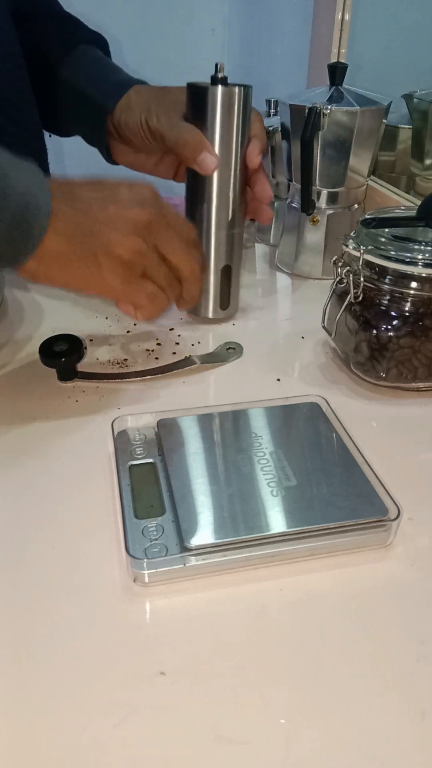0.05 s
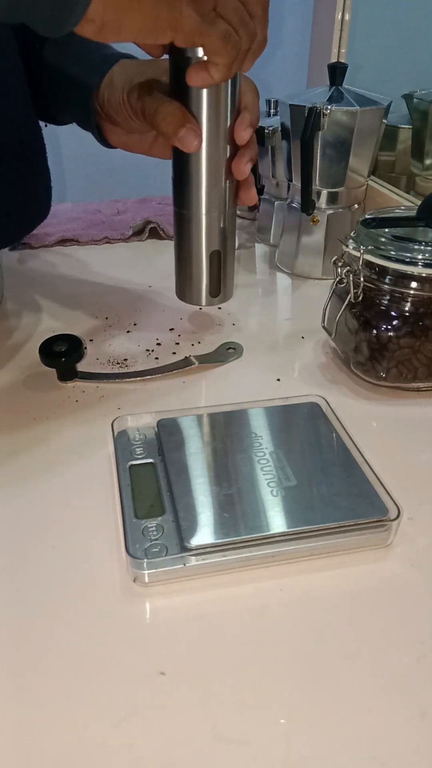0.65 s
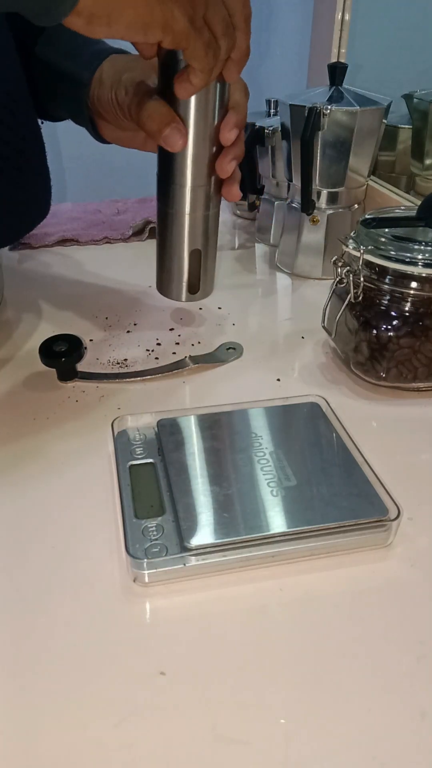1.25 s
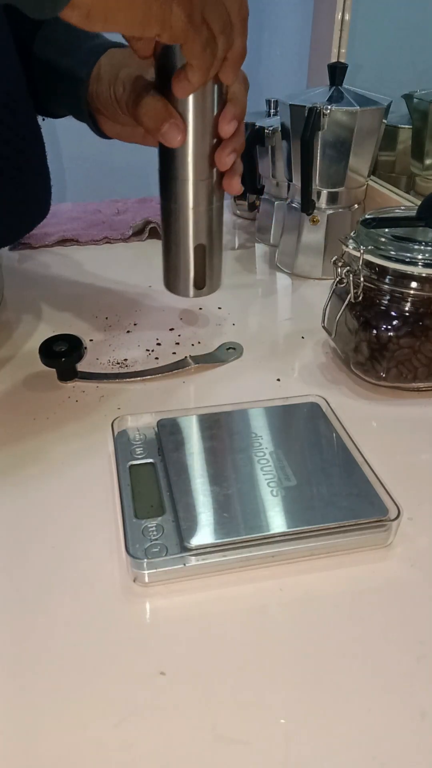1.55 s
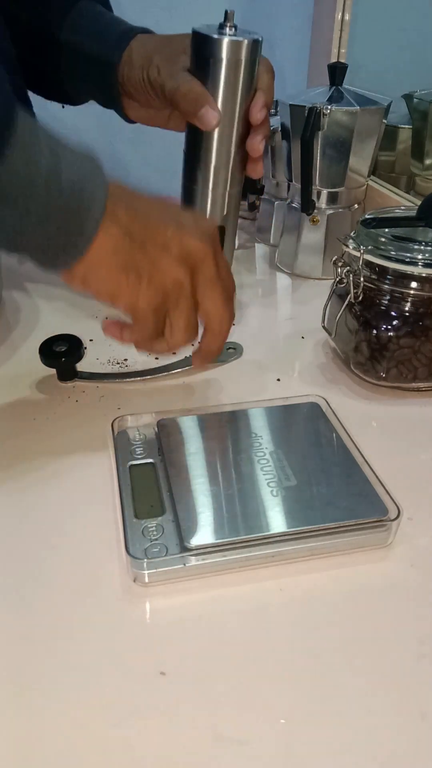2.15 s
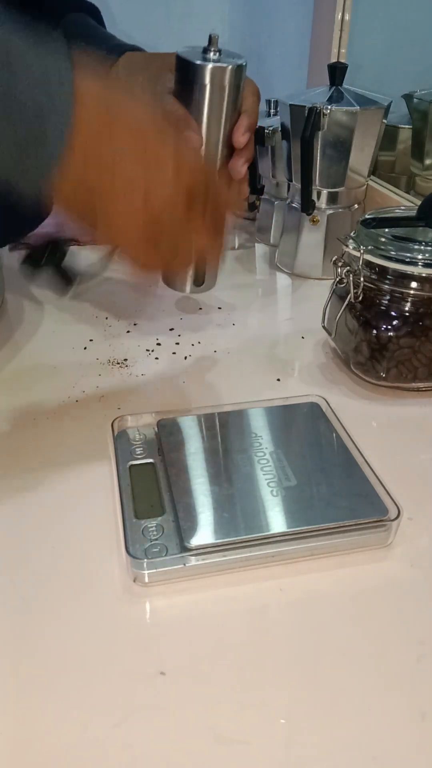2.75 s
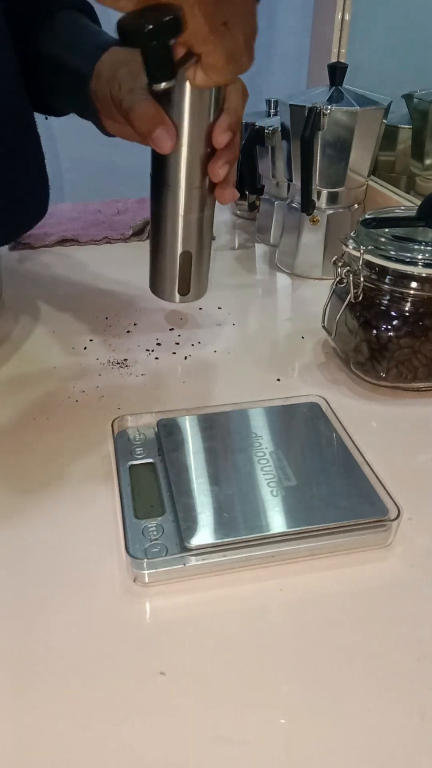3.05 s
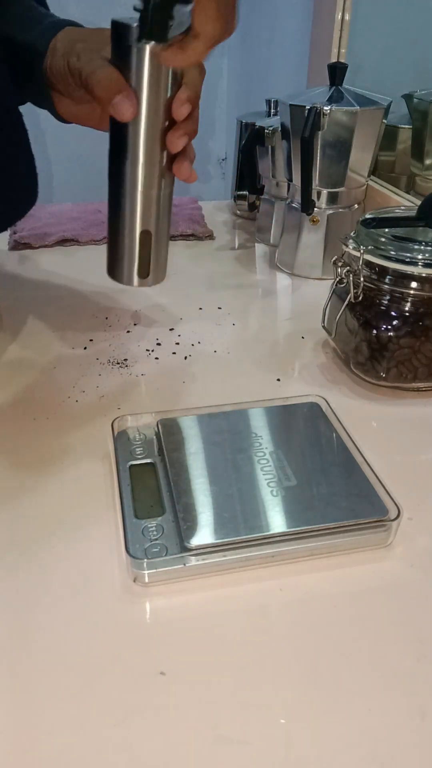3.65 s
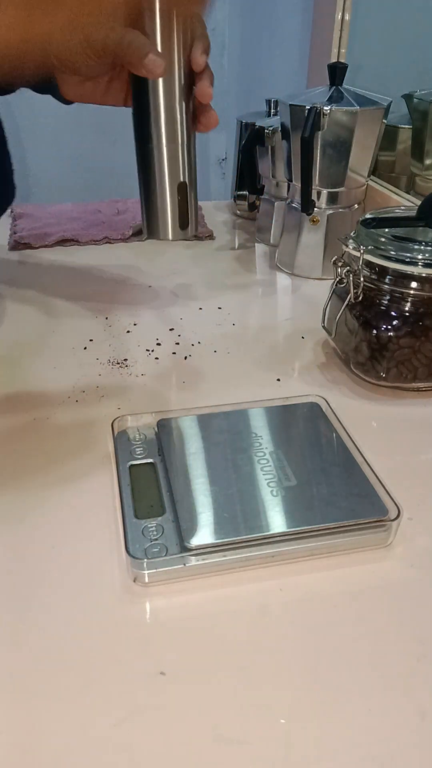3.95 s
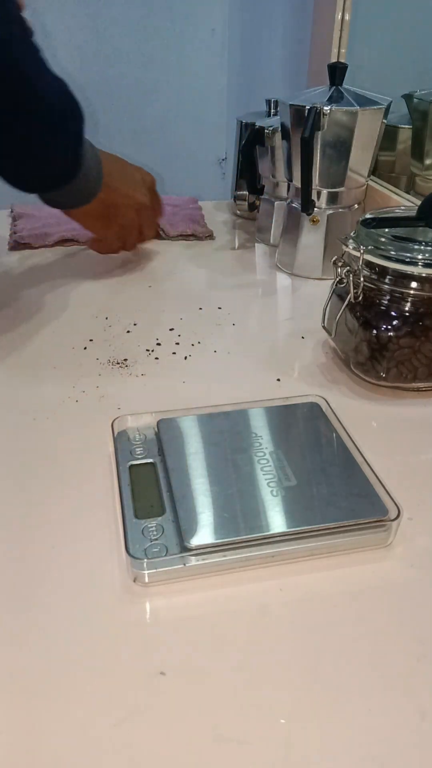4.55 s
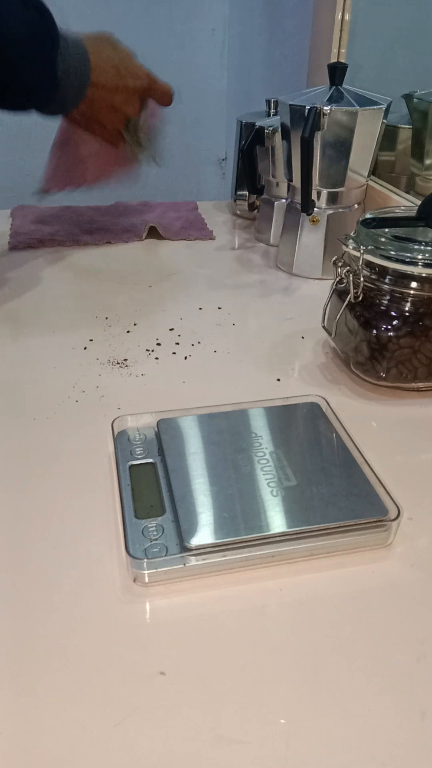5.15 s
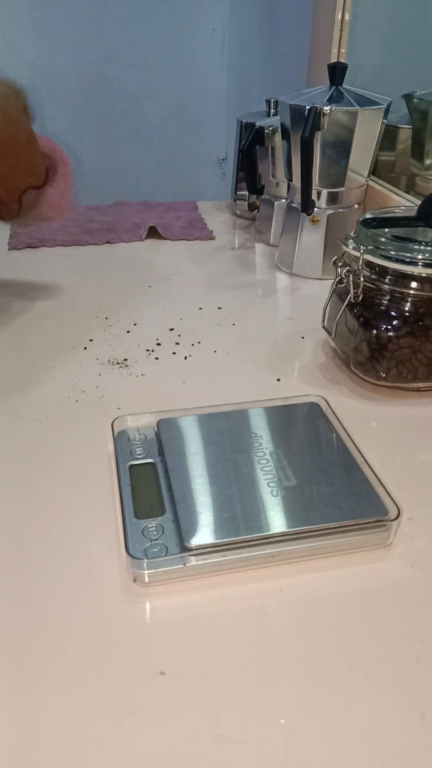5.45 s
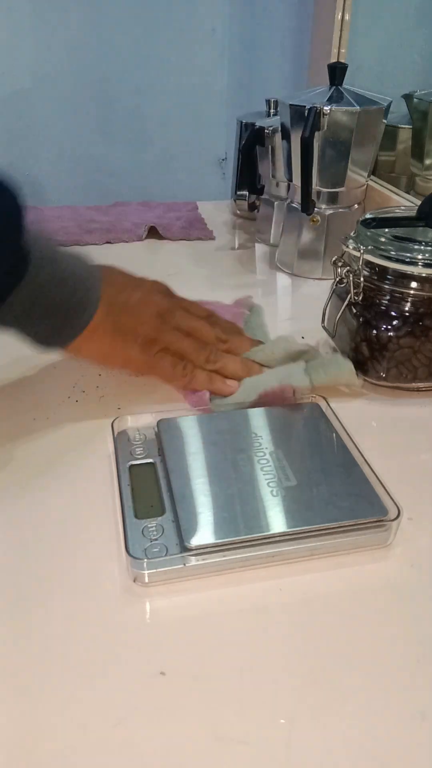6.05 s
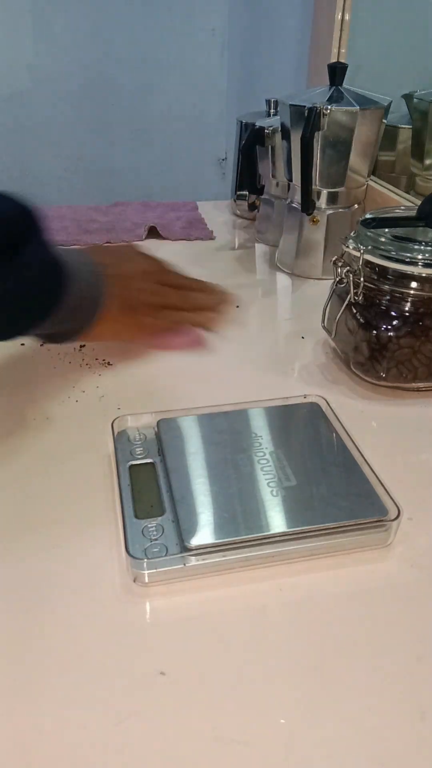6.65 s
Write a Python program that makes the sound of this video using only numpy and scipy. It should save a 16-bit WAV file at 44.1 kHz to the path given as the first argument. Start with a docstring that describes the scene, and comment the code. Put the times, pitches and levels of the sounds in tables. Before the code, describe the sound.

A steel hand coffee grinder is assembled close to the microphone on a kitchen counter. At the very start its base thuds and drags briefly. From about 0.7 to 1.8 seconds the lid scrapes, twists and clicks onto the tube, with faint finger squeaks; the sharpest click, near 0.75 seconds, rings lightly, while later ones are damped by the hand. A thud at 2.3 seconds leads into the crank clattering and scraping off the counter until 2.7. It rattles onto the shaft with bright, ringing clicks at about 3.1 and 3.5 seconds. A few faint ticks and rubs follow. From 5.3 to 6.8 seconds a cloth wipes the counter in soft swishes, with a light knock near 6 seconds. Steady low room noise runs underneath, with a faint hum in the first couple of seconds and a short kitchen echo.

```python
"""Assembling a hand coffee grinder

Close by on a kitchen counter, a steel grinder's base knocks and drags. The lid scrapes and clicks onto
the tube, the crank is dragged off the counter and rattled onto the shaft, then a cloth wipes the counter.
Each hit makes a part ring at its own pitches. Scrapes and rubs are many tiny slips in quick succession.
Under it all are a steady noise, a low hum and the kitchen's short echo."""
import sys
import numpy as np
from scipy import signal
from scipy.fft import rfft, irfft
from scipy.io import wavfile
from scipy.ndimage import uniform_filter1d

SR = 44100
rng = np.random.default_rng(int(sys.argv[2]) if len(sys.argv) > 2 else 0)


def wav_record(signal):
    """Record a signal, one row per channel, as 16-bit PCM in the file named by sys.argv[1]."""
    frames = np.transpose(np.atleast_2d(signal))
    bounded = np.clip(frames, -1, 1)
    # unit amplitude maps onto the largest positive 16-bit level
    quanta = np.round(bounded * 32767).astype(np.int16)
    wavfile.write(sys.argv[1], SR, quanta)


N = 300321
TIME = np.arange(N) / SR
RING_TIME = np.arange(2 ** 14) / SR  # the time given to one hit or stroke

# Levels in the tables are relative: the functions add each source's overall gain.
# The kitchen's steady noise: frequency_hz, level_db
AIR_SPECTRUM = [(15, -49.5), (25, -25.5), (103, -4), (196, -4.5), (226, -9.5), (254, -12.5), (273, -3),
                (398, -8), (492, -12), (581, -10.5), (869, -15.5), (955, -10), (1500, -22.5), (3040, -30),
                (7130, -47.5), (9270, -86)]
# Faint tones in the kitchen: pitch_hz, level_db
ROOM_TONES = [(113.0, -61.5), (403.7, -64), (463.0, -66), (1114, -69)]
# A low hum that swells and fades: time_s, level_db
HUM_LEVELS = [(0.05, -56), (0.51, -62.5), (0.97, -49), (2.32, -64), (2.8, -84)]
# How long the kitchen echoes (a fade time is the time to drop 60 dB): frequency_hz, fade_s
ROOM_FADES = [(110, 0.8), (240, .35), (1000, 0.3), (3000, 0.3), (7000, 0.32), (8500, 0.08)]

# Strokes of skin, cloth and sliding steel: middle_s, level_db, half_length_s, tilt_db_per_octave, ring_hz
RUB_STROKES = [(0.312, -53, 0.035, -9, 1600), (3.305, -50, 0.03, -8, 1660), (3.453, -40, 0.007, -3, 1880),
               (4.32, -56, 0.035, -5.5, 1650), (5.315, -46.5, 0.024, -2, 1530), (5.6, -56.5, 0.1, -4, 2050),
               (6.24, -58.5, 0.08, -1, 3000), (6.288, -47, 0.022, 4, 3850), (6.74, -60, 0.09, 0, 2200)]
# The hiss of rubbing: frequency_hz, level_db
RUB_SPECTRUM = [(500, -26), (1200, 0.5), (1600, 5), (1850, 5.5), (2100, 0.5), (2550, -2.5), (3000, -1.5),
                (4800, -14.5), (7000, -31), (9500, -79.5)]

# The pitches each part rings at, its modes (wider ones die sooner): pitch_hz, width_hz, level_db
COUNTER_PITCHES = [(270, 11, -14), (863, 100, -11), (1290, 180, -28), (352.6, 30, -9), (512, 21, -10),
                   (648, 9.6, -34.5)]
LID_PITCHES = [(1118, 40, 0), (1690, 70, -5), (2020, 70, -2), (2450, 70, 0), (2660, 55, -4), (2925, 55, -5),
               (3130, 90, -5), (3790, 48, -7)]
CRANK_PITCHES = [(861, 67, 0), (1370, 46, -2), (1550, 65, -1), (1800, 74, -1), (2570, 49, -9),
                 (2930, 87, -6), (3280, 68, -9), (6400, 70, -22), (8500, 90, -32), (9400, 40, -34)]
# Each part's crack, made of crowded modes that die quickly: frequency_hz, level_db
COUNTER_CRACK = [(35, -36), (60, -31), (303, 7), (874, -15), (985, -21.5), (1130, -11.5), (1500, -18.5),
                 (3760, -39), (7130, -76), (9270, -112)]
LID_CRACK = [(150, -31.5), (250, 2), (457, -27.5), (1120, -10), (1460, -1.5), (2460, -4), (3390, -7.5),
             (6030, -23.5), (7130, -38), (9270, -43.5), (12500, -63), (15700, -83)]
CRANK_CRACK = [(150, -66.5), (250, -36.5), (526, -10), (883, -4), (1420, -7), (1830, -1), (2140, -4.5),
               (3500, -13.5), (4700, -29), (7130, -42), (10500, -61), (15700, -82)]
# Frequency bands, low to high, that each kind of contact is balanced in: low_hz, high_hz
KNOCK_RANGES = [(150, 600), (600, 1500), (1500, 5000)]
DRAG_RANGES = [(250, 600), (600, 1500), (1500, 5000)]
STEEL_RANGES = [(400, 1200), (1200, 3500), (4000, 10000)]
TWIST_RANGES = [(650, 1200), (1200, 9000)]

# Knocks on the counter or the grinder's body, a plastic scale bumped by the cloth, and the base rocking back: #
# start_s, thud_db, middle_vs_thud_db, crack_vs_thud_db, ring_hz, damping_db_per_s
BASE_KNOCKS = [(0.055, -2, -12, -24.5, 247, 114), (0.101, -9, -24.5, -41.5, 250, 25),
               (0.129, -8, -28.5, -49.5, 270, 106), (1.3868, -18.5, -5.5, -17, 228, 16),
               (1.769, -15.5, -11.5, -16.5, 173, 1291), (2.3452, -1.5, -19.5, -24.5, 267, 456),
               (2.4696, -9.5, -11.5, -19, 293.5, 297.5), (2.506, -11, -4, -22.5, 310, 250),
               (3.676, -31.5, -14.5, -34, 228, 4), (4.708, -43, -22.5, -23.5, 256, 19.5),
               (5.989, -27, 5, 0.5, 352, 151), (6.042, -33.5, -9.5, -6.5, 300, 56),
               (6.108, -39.5, -21, -37, 277, 9)]
# The counter booming under a push: start_s, level_db, pitch_hz
COUNTER_BOOMS = [(0.056, -38, 101.7), (1.77, -43, 125), (2.63, -45.5, 91)]
# Things dragged over the counter: start_s, length_s, ring_hz, thud_db, middle_db, scratch_db
COUNTER_DRAGS = [(0.066, 0.097, 279, -21, -33, -67.5), (2.445, 0.012, 324, -21, -34, -55),
                 (2.548, 0.045, 340, -23, -26, -37.5), (2.585, 0.039, 547, -28, -27, -36.5),
                 (2.617, 0.018, 620, -34, -22, -30), (2.645, 0.018, 916, -23, -25, -45)]

# A finger squeaking on the steel: start_s, length_s, level_db, pitch_hz
FINGER_SQUEAKS = [(0.375, 0.135, -49, 1092), (1.005, 0.075, -47, 830), (1.175, 0.014, -41, 820)]
# The lid twisting on the rim: start_s, length_s, ring_hz, low_db, bright_db
LID_TWISTS = [(0.712, 0.018, 1340, -39, -38.5), (0.728, 0.025, 1120, -31, -24.5),
              (0.755, 0.08, 1100, -37.5, -39), (0.886, 0.025, 3750, -28.5, -30),
              (1.03, 0.089, 2140, -44.5, -55), (1.306, 0.012, 2440, -42, -47),
              (1.376, 0.065, 775, -34.5, -41), (1.742, 0.019, 3900, -41, -46)]
# The lid hitting the tube: start_s, middle_db, low_vs_middle_db, treble_vs_middle_db, ring_hz, rise_s
LID_HITS = [(0.659, -19.5, -24, -24.5, 2160, 0.0012), (0.7317, -18, 10, -26, 2360, 0.0031),
            (0.748, -1.5, -6, -16, 2360, 0.00013), (0.8079, -13.5, -12, -28, 2400, 0.0009),
            (0.8375, -23.5, -9, -23, 1940, 0.001), (0.8809, -17.5, -4, -24, 3900, 0.0031),
            (0.8971, -13, 1.5, -14, 1175, 0.0019), (0.917, -15.5, -1.5, -23, 893, 0.0023),
            (1.0841, -17.5, 3.5, -26, 946, 0.0015), (1.166, -25, 4.5, -23.5, 770, 0.0044),
            (1.3652, -15.5, 2, -13, 692, 0.0035), (1.4, -20.5, -5, -8, 2400, 0.0022),
            (1.763, -18.5, 8.5, -21, 2940, 0.002)]
# The crank clattering on the counter: start_s, middle_db, low_vs_middle_db, ring_hz
CLATTER_HITS = [(2.4126, -15.5, -7.5, 1700), (2.4328, -9, 3, 1620), (2.441, -4.5, 1.5, 1400),
                (2.5346, -3, -3.5, 1840), (2.5465, -7.5, -5.5, 1775)]
# The crank on the shaft: start_s, middle_db, low_vs_middle_db, treble_vs_middle_db, ring_hz, bright_hz
SHAFT_HITS = [(3.1309, -11, -1.5, -8.5, 4240, 4320), (3.1369, -15, -3, -28, 1800, 4280),
              (3.1462, -11, -2.5, -20, 1706, 4260), (3.1742, -13, -5, -17, 2920, 6070),
              (3.4567, -17, -13.5, -12.5, 1800, 6340), (3.473, -13.5, -8.5, -13.5, 991, 7070),
              (4.023, -32.5, -10.5, -10, 1650, 7000), (4.5336, -31.5, -17, -9.5, 2708, 6460)]
# Clean tones that linger after a hit: pitch_hz, fade_s, level_vs_hit_db
LID_AFTERTONES = [(1116, 0.45, -31), (2012, 0.3, -30), (2449, 0.3, -31), (2659, 0.4, -37),
                  (5880, 0.13, -47)]
CRANK_AFTERTONES = [(970, 0.25, -36), (1717, 0.8, -47), (1850, 0.35, -38), (2019, 0.8, -42),
                    (2570, 0.3, -38), (4441, 0.45, -53), (6290, 0.25, -54), (6430, 0.35, -51)]

# How the hand presses during a stroke: attack_s, sag_db_per_s, release_db_per_s
DRAG_PRESSURE = (0.0025, 3.1, 346)
TWIST_PRESSURE = (0.0057, 71, 1300)
SQUEAK_PRESSURE = (0.012, 15, 900)

TREBLE_LIMIT_HZ = 15500
CRANK_RISE_S, CRANK_CRACK_S = 0.00096, 0.021


def amp(db):
    """Turns decibels into a gain."""
    return 10 ** (np.asarray(db) / 20)


def unit(x):
    """Scales a sound to an average (rms) level of 1."""
    return x / np.sqrt(np.mean(x ** 2) + 1e-20)


def look_up(points, hz):
    """Reads between a table's rows on a log-frequency scale."""
    table_hz, value = np.transpose(points)
    return np.interp(np.log(hz + 1), np.log(table_hz + 1), value)


def add(mix, start_s, sound):
    """Mixes a sound in at the given time."""
    part = mix[max(round(start_s * SR), 0):][:len(sound)]
    part += sound[:len(part)]


def band(x, edges_hz):
    """Keeps one frequency band of a sound."""
    return signal.sosfilt(signal.butter(3, edges_hz, "bandpass", fs=SR, output="sos"), x)


def colour(x, spectrum):
    """Shapes the spectrum with a minimum-phase filter, which keeps attacks sharp."""
    size = 4096
    hz = abs(np.fft.fftfreq(size, 1 / SR))
    log_gain = np.log(amp(look_up(spectrum, hz)) + 1e-6)
    taps = np.fft.ifft(np.exp(np.conj(signal.hilbert(log_gain)))).real
    return signal.oaconvolve(x, taps[:size // 2])[:len(x)]


def waver(rate_hz):
    """A random drift up and down, about 1 in size."""
    points = rng.standard_normal(2000)
    return unit(np.interp(TIME * rate_hz, np.arange(len(points)), points))


def tone(hz, wander_hz, rate_hz):
    """A tone whose pitch wanders."""
    pitch_hz = hz + wander_hz * waver(rate_hz)
    return unit(np.sin(2 * np.pi * np.cumsum(pitch_hz) / SR))


def background(air_db=-53.5, swell_db=1.0, tones_db=0.5, hiss_db=-88.5):
    """Steady kitchen noise, faint wavering tones, a low hum and the microphone's own hiss."""
    air = amp(air_db + swell_db * waver(19)) * unit(colour(rng.standard_normal(N), AIR_SPECTRUM))
    tones = sum(amp(db + tones_db + 0.66 * waver(26)) * tone(hz, wander_hz=5.5, rate_hz=30)
                for hz, db in ROOM_TONES)
    hiss = amp(hiss_db) * rng.standard_normal(N)
    hum_s, hum_db = np.transpose(HUM_LEVELS)
    hum_gain = uniform_filter1d(np.interp(TIME, hum_s, amp(hum_db), left=0, right=0), size=200)
    return air + tones + hiss + hum_gain * tone(hz=59, wander_hz=5.6, rate_hz=40)


def kitchen(x, early_db, tail_db):
    """Adds echoes from counter and wall, then a short tail in which the bass lasts longest."""
    t = RING_TIME
    hz, frame_s, noise = signal.stft(rng.standard_normal(len(t)), SR, nperseg=256)
    fade = amp(-60 * frame_s / look_up(ROOM_FADES, hz)[:, None])
    tail = signal.istft(noise * fade, SR, nperseg=256)[1][:len(t)]
    tail *= np.clip(t / 0.018, 0, 1)
    early = np.zeros(len(t))
    early[(SR * rng.uniform(.001, .011, size=8)).astype(int)] = rng.choice([-1, 1], size=8)
    echoes = amp(early_db) * early / np.linalg.norm(early) + amp(tail_db) * tail / np.linalg.norm(tail)
    return x + signal.oaconvolve(x, echoes)[:N]


def slips(per_s, spread_db, size):
    """Tiny slips at random moments; spread_db makes a few larger than the rest."""
    sizes = amp(spread_db * np.minimum(rng.exponential(1, size), 4)) * rng.choice([-1, 1], size)
    return sizes * (rng.random(size) < per_s / SR)


def rubs(gain_db=-3.0, uneven_db=3.2):
    """Skin, cloth and steel catch and slip in a soft hiss that rings the thing they touch."""
    friction = slips(per_s=2100, spread_db=0, size=N) * amp(uneven_db * waver(70))
    out = np.zeros(N)
    for middle_s, level_db, half_length_s, tilt_db, ring_hz in RUB_STROKES:
        tilted = [(hz, db + tilt_db * np.log2(hz / RUB_SPECTRUM[0][0])) for hz, db in RUB_SPECTRUM]
        hiss = colour(friction, tilted)
        ringing = signal.lfilter(*signal.iirpeak(ring_hz, Q=16, fs=SR), hiss)
        rub = unit(band(hiss, (400, 12000))) + 0.5 * unit(ringing)
        swell = np.exp(-((TIME - middle_s) / half_length_s) ** 2 / 2)
        out += amp(level_db + gain_db) * unit(rub) * swell
    return kitchen(out, early_db=-4.0, tail_db=-14.0)


def ring(modes, crack_spectrum, crack_s, crack_db, contact_hz):
    """One tap: ringing tones and a short crack. A softer contact (lower contact_hz) dulls the tones."""
    t = RING_TIME
    hz, width_hz, db = np.transpose(modes)[:, :, None]
    spot_db = 2 * rng.standard_normal(db.shape)  # each spot struck favours other modes
    hz = hz * (1 + 0.012 * rng.standard_normal(hz.shape))  # the grip shifts each pitch a little
    size = amp(db + spot_db) * width_hz * rng.choice([-1, 1], db.shape)
    tones = np.sum(size * np.exp(-np.pi * width_hz * t) * np.sin(2 * np.pi * hz * t), axis=0)
    tones = band(tones, (0.32 * hz.min(), min(contact_hz, SR / 4)))
    crack = colour(rng.standard_normal(len(t)) * amp(-60 * t / crack_s), crack_spectrum)
    return unit(tones) + amp(crack_db) * unit(crack)


def balance(x, bands, band_db):
    """Balances low, middle and high, as the hardness and place of a hit do."""
    hz, power = np.fft.rfftfreq(len(x), 1 / SR), abs(rfft(x)) ** 2
    spectrum = []
    for (low, high), db in zip(bands, band_db):
        share = power[(hz > low) & (hz < high)].sum() / power.sum()
        spectrum += [(f, db - 10 * np.log10(share)) for f in np.geomspace(low, high, num=6)[[1, 4]]]
    return colour(x, spectrum)


def hits(rows, modes, crack_spectrum, bands, main_band, gain_db, lead_db, lead_width_hz, **contact):
    """Strikes a part once per row; the grip decides which pitch leads each time."""
    out = np.zeros(N)
    for start_s, db, lower_db, upper_db, lead_hz, rise_s, damping_db_per_s, *extra_modes in rows:
        hit = ring([*modes, (lead_hz, lead_width_hz, lead_db), *extra_modes], crack_spectrum, **contact)
        hit *= 1 - np.exp(-RING_TIME / rise_s)  # the parts slide into place
        hit *= amp(-damping_db_per_s * RING_TIME)  # hand or counter stills them
        lowest_hz = min(lead_hz, *(mode[0] for mode in modes))
        hit = band(hit, (0.54 * lowest_hz, TREBLE_LIMIT_HZ))  # little sound below the lowest mode
        band_db = [0, lower_db, upper_db] if main_band == 0 else [lower_db, 0, upper_db]
        hit = balance(hit, bands, band_db)
        peak = np.sqrt(2 * uniform_filter1d(band(hit, bands[main_band]) ** 2, size=128).max())
        add(out, start_s, amp(db + gain_db) * hit / peak)
    return out


def linger(rows, aftertones):
    """Each hit leaves clean tones ringing, a little differently each time."""
    out, t = np.zeros(N), RING_TIME
    hz, fade_s, tone_db = np.transpose(aftertones)[:, :, None]
    end_fade = np.minimum(10 * (1 - t / t[-1]), 1)
    for start_s, db, *_ in rows:
        size = amp(db + tone_db + rng.standard_normal(hz.shape)) * rng.choice([-1, 1], hz.shape)
        tones = np.sum(size * amp(-60 * t / fade_s) * np.sin(2 * np.pi * hz * t), axis=0)
        add(out, start_s, tones * end_fade)
    return out


def stroke(length_s, attack_s, sag_db_per_s, release_db_per_s):
    """Pressure builds, sags while the hand moves, then lets go."""
    t = RING_TIME
    drop_db = sag_db_per_s * t + release_db_per_s * np.maximum(t - length_s, 0)
    return np.minimum(t / attack_s, 1) * amp(-drop_db)


def scrape(rows, press, modes, crack_spectrum, bands, gain_db, slips_per_s, spread_db, grit_db,
           lead_db, lead_width_hz):
    """Tiny slips ring a part as it slides; the grip decides which pitch leads."""
    out = np.zeros(N)
    for start_s, length_s, lead_hz, *band_db in rows:
        body = ring([*modes, (lead_hz, lead_width_hz, lead_db)], crack_spectrum,
                    crack_s=0.012, crack_db=grit_db, contact_hz=7000)
        rubbed = irfft(rfft(slips(slips_per_s, spread_db, len(body))) * rfft(body))  # one ring per slip
        pressure = stroke(length_s, *press)
        for db, edges_hz in zip(band_db, bands):
            part = band(rubbed, edges_hz) * pressure
            add(out, start_s, amp(db + gain_db) * part * np.linalg.norm(pressure) / np.linalg.norm(part))
    return out


def counter_booms(fade_s=0.97):
    """A push makes the counter boom faintly at one low pitch."""
    return sum(linger([(start_s, db)], [(hz, fade_s, 0)]) for start_s, db, hz in COUNTER_BOOMS)


def counter_drags():
    """Steel dragged over the counter catches and slips, making the counter ring."""
    drags = scrape(COUNTER_DRAGS, DRAG_PRESSURE, COUNTER_PITCHES, CRANK_CRACK, DRAG_RANGES, gain_db=0,
                   slips_per_s=1800, spread_db=1.0, grit_db=3.0, lead_db=-5, lead_width_hz=48)
    return kitchen(drags, early_db=-11.0, tail_db=-21.5)


def base_knocks(rise_s=0.0069):
    """The grinder's body, the counter and a scale nudged by the cloth thud when knocked, and the hand damps
    them."""
    rows = [(*row, rise_s, damping) for *row, damping in BASE_KNOCKS]
    knocks = hits(rows, COUNTER_PITCHES, COUNTER_CRACK, KNOCK_RANGES, main_band=0, gain_db=0,
                  lead_db=4.5, lead_width_hz=24, crack_s=0.022, crack_db=1.5, contact_hz=3000)
    return kitchen(band(knocks, (115, 9000)), early_db=-12.5, tail_db=-16.0)


def finger_squeaks(wander_hz=13, flutter_db=2.5, tremble_hz=110):
    """Skin sticks and slips on the steel: a thin whistle that trembles in pitch and level."""
    out = np.zeros(N)
    for start_s, length_s, db, hz in FINGER_SQUEAKS:
        whistle = unit(tone(hz, wander_hz, tremble_hz) * amp(flutter_db * waver(tremble_hz)))
        add(out, start_s, amp(db) * stroke(length_s, *SQUEAK_PRESSURE) * whistle[:len(RING_TIME)])
    return out


def lid(seated_s=1.0, hand_damping_db_per_s=400):
    """The lid clicks and catches on the rim; once it sits on the tube, the hand stops its ringing."""
    rows = [(start_s, *row, hand_damping_db_per_s * (start_s > seated_s)) for start_s, *row in LID_HITS]
    clicks = hits(rows, LID_PITCHES, LID_CRACK, STEEL_RANGES, main_band=1, gain_db=-6.5,
                  lead_db=7.5, lead_width_hz=110, crack_s=0.026, crack_db=3, contact_hz=7000)
    twists = scrape(LID_TWISTS, TWIST_PRESSURE, LID_PITCHES, LID_CRACK, TWIST_RANGES, gain_db=4.0,
                    slips_per_s=800, spread_db=1.5, grit_db=-5, lead_db=5, lead_width_hz=55)
    ringing = linger([row for row in LID_HITS if row[0] < seated_s], LID_AFTERTONES)
    return kitchen(clicks + twists + finger_squeaks(), early_db=-8.0, tail_db=-16.5) + ringing


def crank_on_counter(treble_db=-27, damping_db_per_s=295, muffle_hz=(150, 4600)):
    """The crank clatters, muffled and damped by the counter it lies on."""
    rows = [(start_s, db, low_db, treble_db, hz, CRANK_RISE_S, damping_db_per_s)
            for start_s, db, low_db, hz in CLATTER_HITS]
    clatter = hits(rows, CRANK_PITCHES, CRANK_CRACK, STEEL_RANGES, main_band=1, gain_db=-3.5,
                   lead_db=4, lead_width_hz=220, crack_s=CRANK_CRACK_S, crack_db=-8, contact_hz=2100)
    muffled = band(band(clatter, muffle_hz), muffle_hz)
    return kitchen(muffled, early_db=-11.0, tail_db=-21.5)


def crank_on_shaft(bright_width_hz=420, bright_db=-13):
    """The crank rings freely on the shaft, with a bright pitch that depends on where it touches."""
    rows = [(*row, CRANK_RISE_S, 0, (hz, bright_width_hz, bright_db)) for *row, hz in SHAFT_HITS]
    clicks = hits(rows, CRANK_PITCHES, CRANK_CRACK, STEEL_RANGES, main_band=1, gain_db=-4.5,
                  lead_db=9.5, lead_width_hz=99, crack_s=CRANK_CRACK_S, crack_db=3, contact_hz=9550)
    return kitchen(clicks, early_db=-8.0, tail_db=-14.5) + linger(SHAFT_HITS, CRANK_AFTERTONES)


def scene():
    """Counter, lid, crank and cloth in a small kitchen, mixed to one channel."""
    counter = base_knocks() + counter_drags() + counter_booms()
    steel = lid() + crank_on_counter() + crank_on_shaft()
    return (counter + steel + rubs() + background())[None]


def record(dry):
    """Rounds off the largest peaks, then cuts the highest treble."""
    ceiling = 0.98
    rounded = dry / (1 + (dry / ceiling) ** 16) ** (1 / 16)
    low_pass = signal.firwin(511, TREBLE_LIMIT_HZ, window=("kaiser", 9), fs=SR)
    return signal.oaconvolve(rounded, low_pass[None], "same")


dry = scene()
out = record(dry)
wav_record(out)
```